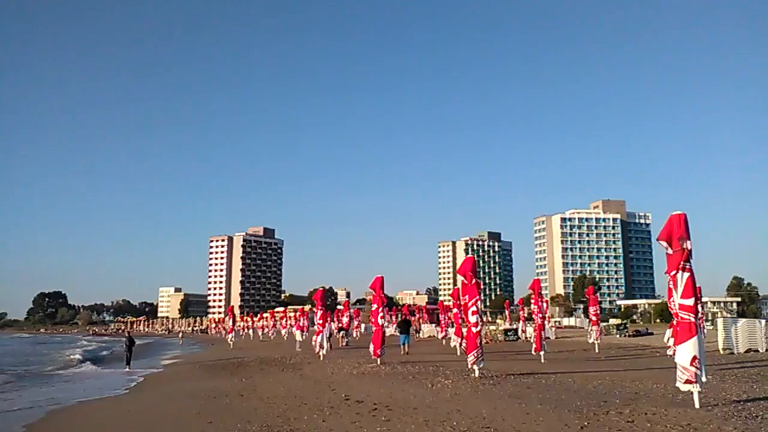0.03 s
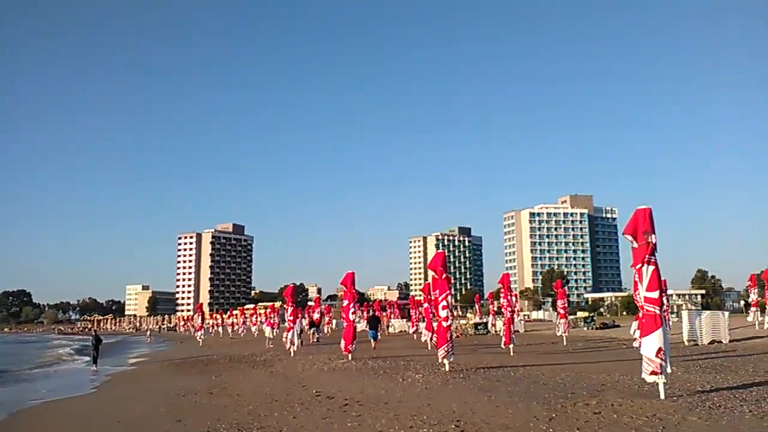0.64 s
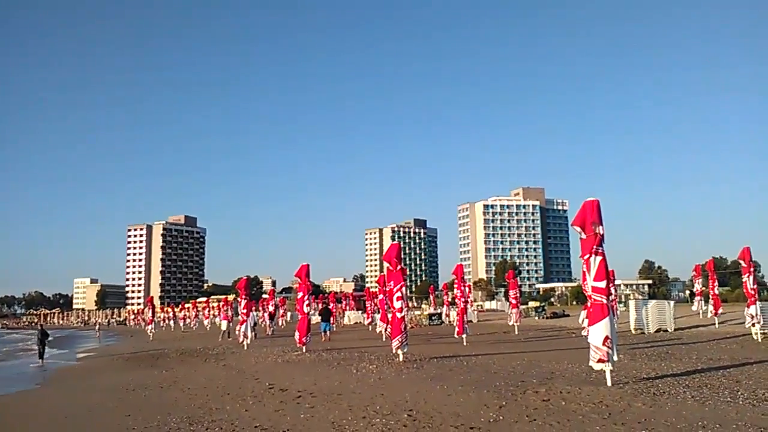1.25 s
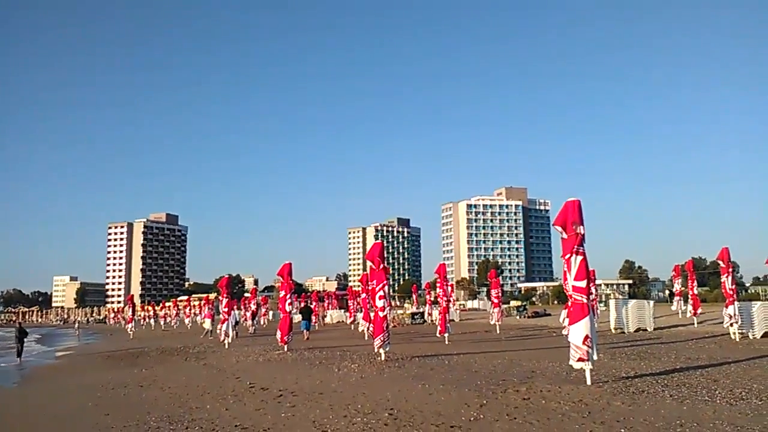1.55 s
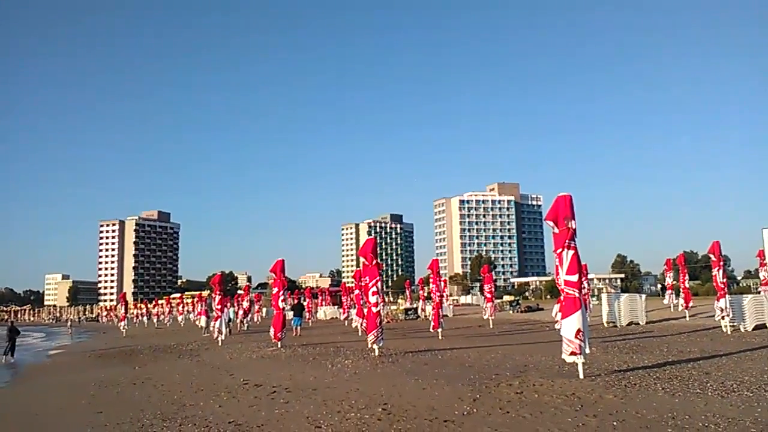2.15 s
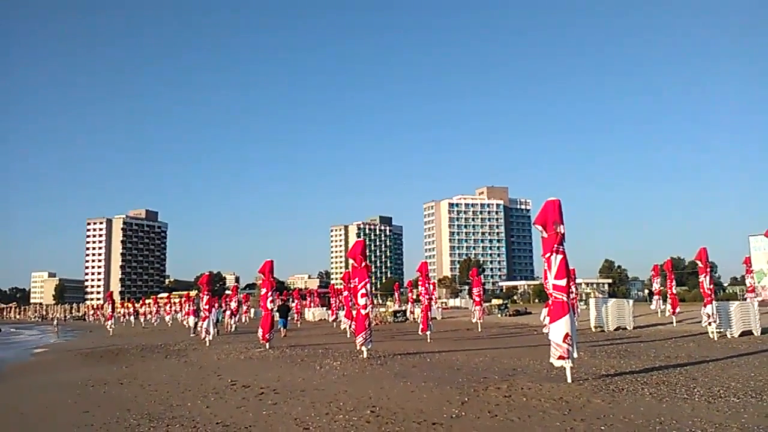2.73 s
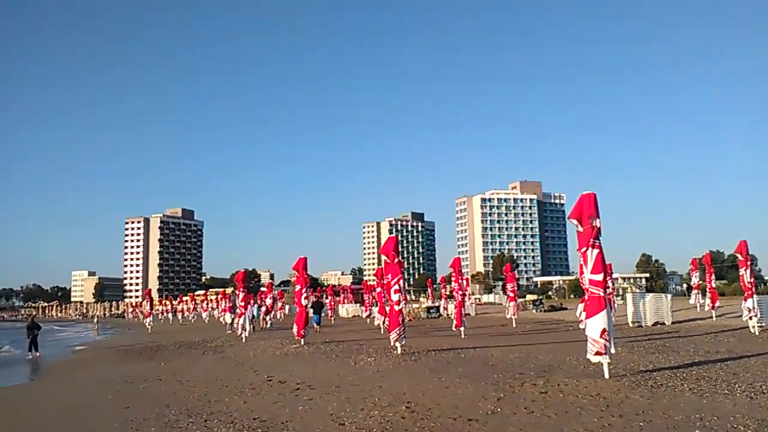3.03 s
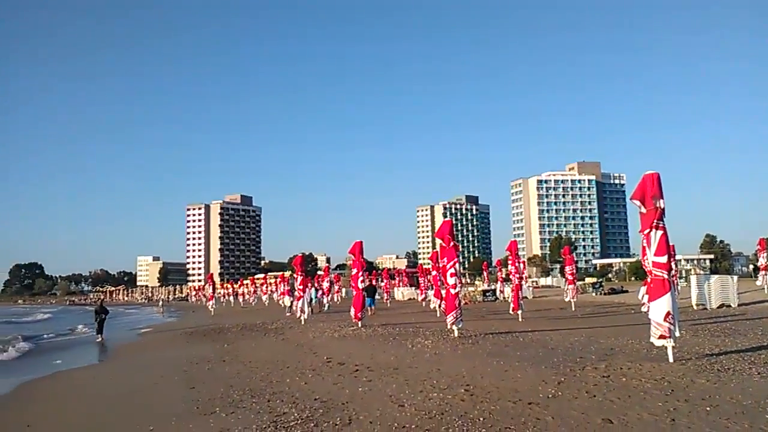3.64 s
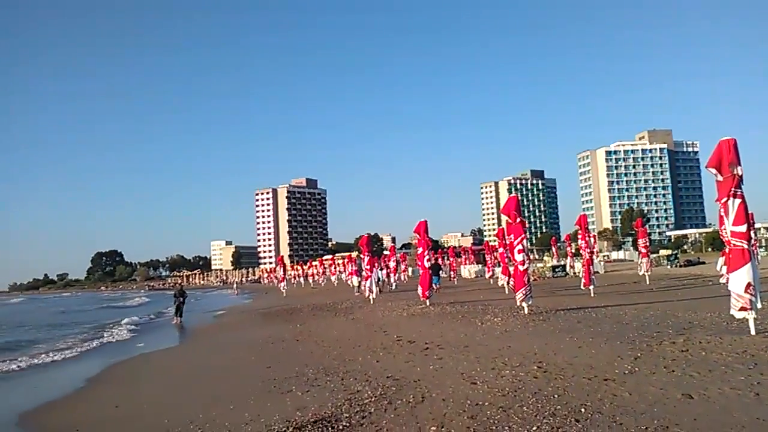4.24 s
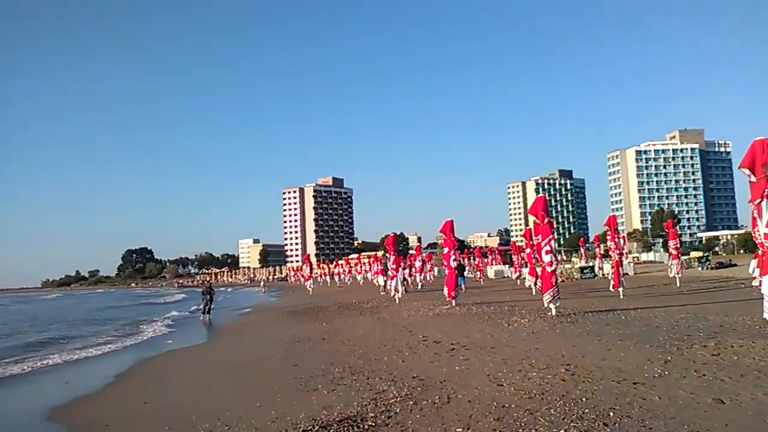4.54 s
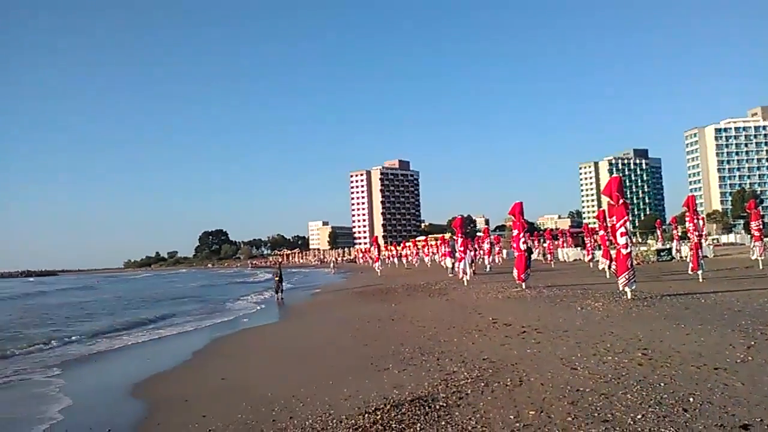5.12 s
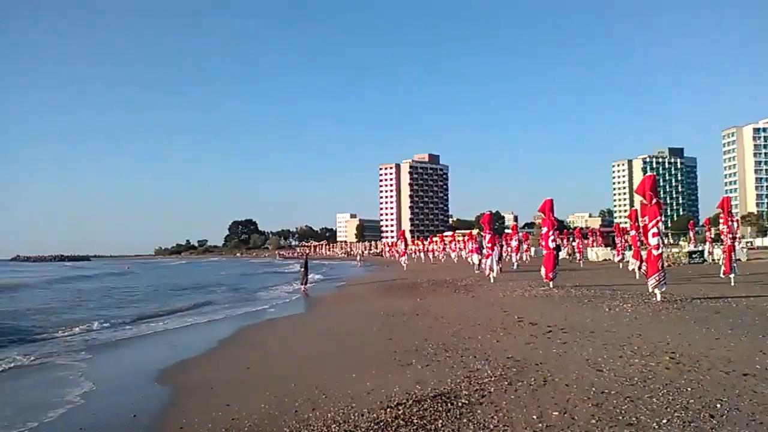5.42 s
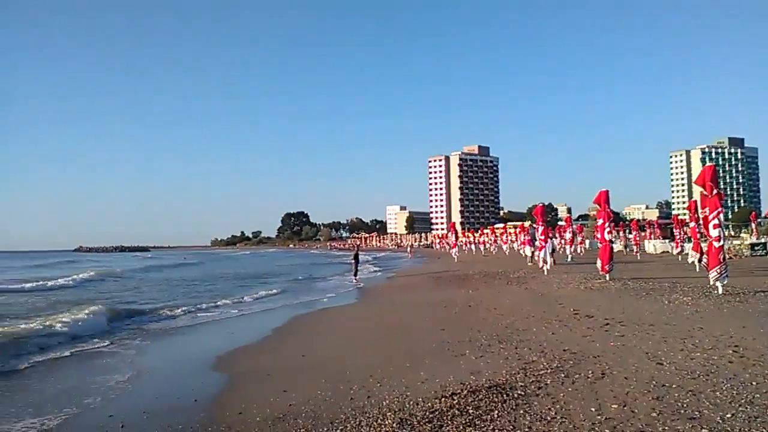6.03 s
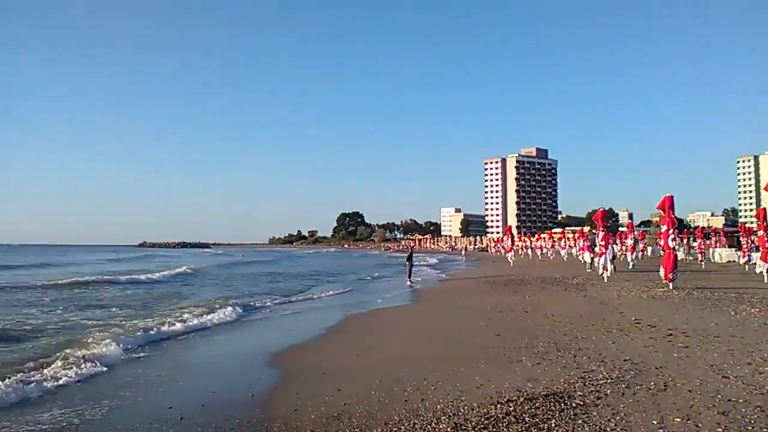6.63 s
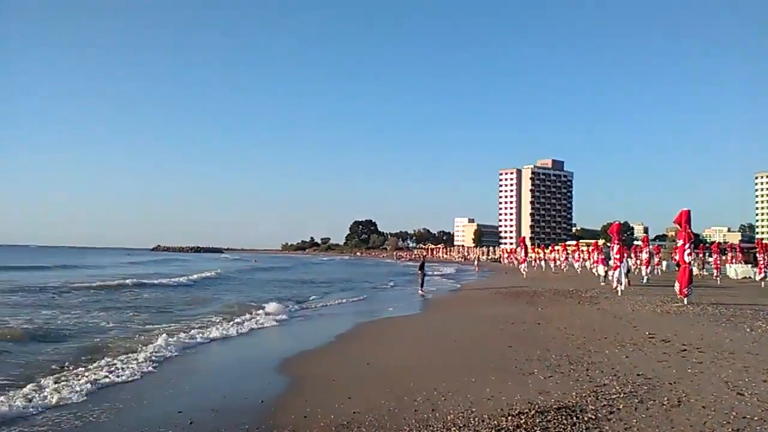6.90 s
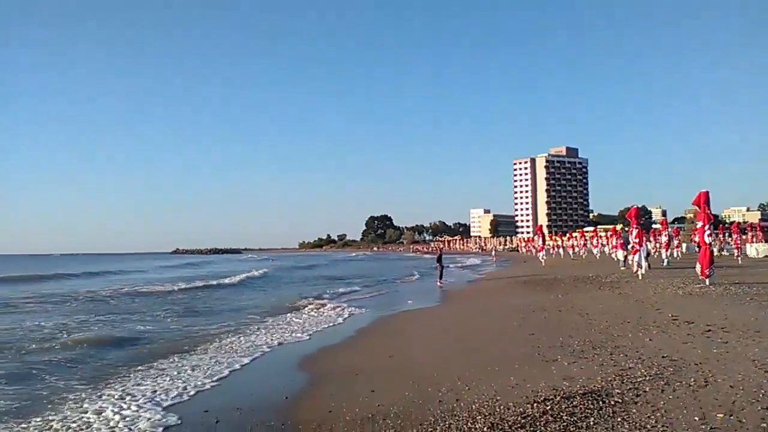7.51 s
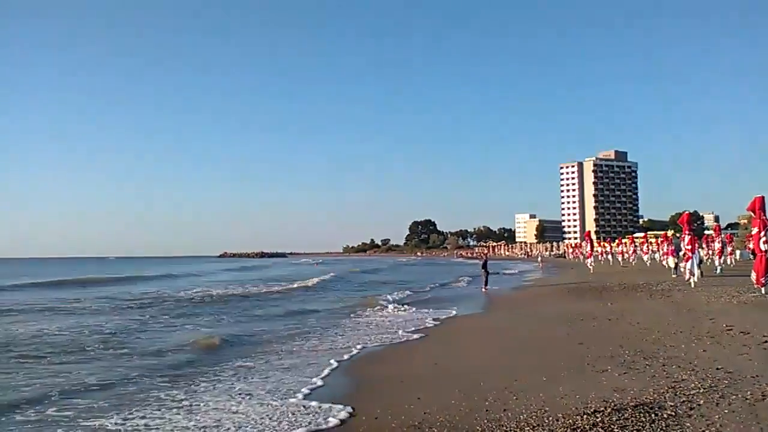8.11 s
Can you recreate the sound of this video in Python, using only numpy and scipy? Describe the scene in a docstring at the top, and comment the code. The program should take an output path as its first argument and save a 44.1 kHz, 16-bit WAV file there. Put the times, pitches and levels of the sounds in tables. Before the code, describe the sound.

Gentle surf tumbles, lulls, then breaks again closer and fizzes over sand, while a gusty breeze buffets the microphone.

```python
"""On a sandy beach a small wave breaks and runs out, the sea lulls, and a second breaks closer and foams
up the sand. Roar, foam and spray are turbulent noise mixed with damped ringing of bubbles and droplets.
A hand-held microphone turns slowly towards the water, so a close reflection interferes with the direct
sound and sweeps notches through the hiss. A breeze rumbles on the microphone and strikes it in gusts."""
import sys
import numpy as np
from scipy import signal
from scipy.fft import rfft, irfft, next_fast_len
from scipy.io import wavfile
from scipy.ndimage import uniform_filter1d, map_coordinates

SR = 44100
rng = np.random.default_rng(int(sys.argv[2]) if len(sys.argv) > 2 else 0)


def wav_out(sig):
    """Save sig, one row per channel (or a flat mono array), as 16-bit PCM at SR to the path in sys.argv[1]."""
    wavfile.write(sys.argv[1], SR, np.round(np.clip(np.atleast_2d(sig).T, -1, 1) * 32767).astype(np.int16))


N = 368676
BAND_LIMIT_HZ = 14250


# Breaking waves. Each row: time of full strength in seconds, length of the tumble in seconds,
# build-up in dB per second, roar level in dB, spray level in dB.
BREAKING_WAVES = [(1.68, 0.26, 8.5, -29, -36.5), (4.3, 0.21, 17.5, -35.5, -58),
                  (5.87, 0.13, 27, -35.5, -68), (6.43, .18, 36.5, -26.5, -41.5),
                  (6.83, 0.32, 37, -27, -35.5)]
# Sheets of water running up the sand. Each row: time of full strength in seconds, length in seconds,
# build-up in dB per second, foam level in dB, share of the fizz that carries, spray level in dB.
SWASHES = [(.62, 0.42, 17, -54, .2, -40.5), (1.6, 0.21, 14, -46.5, .3, -48), (3.2, 0.71, 20, -64, .2, -52),
           (3.848, 0.29, 20, -43.5, 0.36, -67), (5.616, 0.19, 15, -40.5, .05, -72),
           (7.0, 0.45, 32, -35.5, 0.86, -42.5), (8.31, 0.067, 40, -40.5, .95, -46)]

def surf_levels(t, far_roar_db=-39, far_foam_db=-61, far_spray_db=-55.5):
    """Incoherent addition: breakers, swashes and the far shore sum in power to four levels in dB."""
    roars, foams, fizzes, sprays = [far_roar_db], [far_foam_db], [], [far_spray_db]
    for start, length, build, roar_db, spray_db in BREAKING_WAVES:
        roars.append(roar_db + surge(t, start, length, build, fall_db_per_s=43))
        # spray bursts out faster than the roar builds
        sprays.append(spray_db + surge(t, start, length, 1.8 * build, fall_db_per_s=30.5))
    for start, length, build, foam_db, fizz_share, spray_db in SWASHES:
        # a sheet dies ever faster as it thins
        run_db = surge(t, start, length, build, fall_db_per_s=7.5, drag_db_per_s2=1)
        foams.append(foam_db + run_db)
        fizzes.append(foam_db + run_db + 20 * np.log10(np.clip(fizz_share, 1e-6, 1)))
        sprays.append(spray_db + run_db)
    return power_sum(roars), power_sum(foams), power_sum(fizzes), power_sum(sprays)


# Spectrum of tumbling water. Each row: frequency in Hz, relative level in dB.
ROAR_SPECTRUM = [(17, -46), (35, -11), (60, -4), (150, 2.5), (350, -0.5), (800, -4), (1500, -6.5),
                 (2500, -9.5), (4000, -15), (5000, -27), (6500, -37.5), (9000, -59), (14000, -67)]

def roar(level_db):
    """Turbulence in a breaker gives a lumpy rush, in which large bubbles resonate as a gurgle."""
    gurgle = amp(-15) * bubbles(count=3000, centre_hz=858, spread=0.553, cycles=32, scatter_db=1, size=640)
    return amp(level_db + 0.07 * wobble(18)) * coloured(churn(patchy_db=1.16) + gurgle, ROAR_SPECTRUM)


# Spectrum of foam on sand. Each row: frequency in Hz, relative level in dB.
FOAM_SPECTRUM = [(150, -44), (300, -10.5), (900, 1.5), (1600, -7), (2300, -2.5), (3200, -6.5), (4200, -16),
                 (5300, -8.5), (6800, -23), (9000, -56), (14000, -59)]

def foam(level_db, fizz_db, side_db=-6):
    """Small bubbles resonate at high pitch, so the sheet seethes as it runs over the sand ahead."""
    seethe = amp(-6) * bubbles(count=9500, centre_hz=2403, spread=0.391, cycles=34, scatter_db=2, size=300)
    sheet = coloured(churn(patchy_db=3) + seethe, FOAM_SPECTRUM) * amp([[0], [side_db]])
    # the finest fizz carries only when the foam is near
    fizz = filtered(sheet, lambda hz: along([(3500, 0.01), (4800, 0.76)], hz))
    carry = amp(fizz_db - level_db)
    return amp(level_db + 0.084 * wobble(25)) * (sheet + (carry - 1) * fizz)


# Spectrum of falling droplets. Each row: frequency in Hz, relative level in dB.
SPRAY_SPECTRUM = [(500, -59), (1000, -20), (2500, -10.5), (3700, -1), (5000, -12.5), (6500, -24),
                  (8200, -27), (11000, -35), (14000, -37.5)]

def spray(level_db):
    """Impact noise: droplets thrown from the crest patter back and merge into a fine hiss."""
    patter = amp(-12) * bubbles(count=7000, centre_hz=5500, spread=0.34, cycles=4, scatter_db=2, size=64)
    return amp(level_db + 0.32 * wobble(20)) * coloured(churn(patchy_db=2.35) + patter, SPRAY_SPECTRUM)


def churn(patchy_db):
    """Scattered splashes modulate two white noises (mid, side) in patches of time and frequency."""
    spectra = signal.stft(rng.standard_normal((2, N)), nperseg=512)[2]
    patches = uniform_filter1d(rng.standard_normal(spectra.shape[1:]), size=7, axis=0)
    patches = uniform_filter1d(patches, size=10, axis=1)
    return unit(signal.istft(spectra * amp(patchy_db * unit(patches)), nperseg=512)[1][:, :N])


def bubbles(count, centre_hz, spread, cycles, scatter_db, size):
    """Each bubble is a damped oscillator, size samples long, whose pitch rises as it nears the surface."""
    start, rank = rng.random((count, 2)).T[:, :, None]
    hz = np.clip(centre_hz * np.exp(spread * rng.standard_normal((count, 1))), 200, BAND_LIMIT_HZ)
    k = np.arange(size)
    turns = hz * k / SR
    age = turns / cycles
    strength = amp(-scatter_db * np.log(1 - .995 * rank))
    envelope = strength * np.exp(-3 * age) * (1 - k / size)
    ring = envelope * np.sin(2 * np.pi * turns * (1 + 0.063 * np.minimum(age, 2)))
    samples = (start * N).astype(int) + k
    return unit(np.bincount(samples.ravel(), ring.ravel(), N)[:N])


# The turn towards the sea. Each row: time in seconds, frequency of the first deep notch in Hz.
NOTCH_PATH = [(0.62, 2160), (2.75, 2110), (3.1, 2650), (4.3, 3020), (5.15, 2800), (5.7, 3370), (6.6, 3320),
              (7.35, 3780), (8.36, 3820)]
# The reflection, as off the hand. Each row: frequency in Hz, share that reaches the microphone.
ECHO_SHARE = [(600, 0.16), (1800, 1), (3000, 1.0), (5000, 0.47), (9000, 0.11), (13000, .02)]

def close_reflection(x, spacing=0.83, onset_hz=2020, growth_hz=755):
    """Comb filtering: as the microphone turns, an echo shortens and strengthens, and its notches climb."""
    hz, t, spectra = signal.stft(x, SR, nperseg=512)
    notch_hz = curve(NOTCH_PATH, t)
    strength = 0.69 * (1 - np.exp(-np.maximum(notch_hz - onset_hz, 0) / growth_hz))
    lag_cycles = (hz[:, None] / notch_hz - 1) / spacing  # notches lie spacing * notch_hz apart
    echo = strength * along(ECHO_SHARE, hz)[:, None] * np.exp(-2j * np.pi * lag_cycles)
    return signal.istft(spectra * (1 - echo), SR, nperseg=512)[1][:, :N]


# Slow drift of the finest hiss. Each row: time in seconds, base lift of the treble in dB.
TREBLE_DRIFT = [(.62, -5.5), (1.5, -7), (2.3, 4.5), (4.3, 4.5), (5.0, 6.5), (5.4, 6), (6.2, -2), (6.5, 2.5),
                (8.36, -5)]
# Stereo spread by frequency: centred below about 4 kHz, wider in the top hiss.
# Each row: frequency in Hz, gain of the side signal in dB.
SIDE_GAIN = [(3950, -80), (4150, -28), (5200, -14), (6200, -9.5), (7500, -4), (13000, -3.5)]

def sea(hiss_follows=0.81, even_db=9.5):
    """Superposition of roar, foam and spray in mid-side stereo; only the top of the hiss is wide."""
    t = np.arange(N) / SR
    roar_db, foam_db, fizz_db, spray_db = surf_levels(t)
    water = close_reflection(roar(roar_db) + foam(foam_db, fizz_db) + spray(spray_db))
    # the finest hiss comes and goes with the tumbling water
    lift_db = curve(TREBLE_DRIFT, t) + hiss_follows * (roar_db - spray_db - even_db)
    treble = filtered(water, lambda hz: along([(5500, 0.043), (11500, 0.78)], hz))
    mid, side = water + (amp(lift_db) - 1) * treble
    side = filtered(side, lambda hz: amp(along(SIDE_GAIN, hz)))
    return np.array([mid + side, mid - side])


# Falling crests: a surface slap is high, a plunge of trapped air is low.
# Each row: start in seconds, length in seconds, level in dB, centre frequency in Hz.
FALLING_CRESTS = [(1.806, .13, -38.5, 740), (5.719, 0.052, -39.5, 2300), (5.877, 0.021, -35.5, 2300),
                  (6.416, 0.05, -31, 1850), (6.54, 0.2, -34, 240), (7.088, 0.14, -34, 2330)]

def crests(width_octaves=0.34):
    """Bubble resonance: a crest drives in bubbles of about one size, heard as a brief band of noise."""
    out, t = np.zeros(N + SR), np.arange(SR // 2) / SR
    hz = np.fft.rfftfreq(len(t), 1 / SR)
    for start, length, db, centre_hz in FALLING_CRESTS:
        band = np.exp(-.5 * (np.log2((hz + 1) / centre_hz) / width_octaves) ** 2)
        cloud = unit(irfft(band * rfft(rng.standard_normal(len(t))), len(t)))
        swell = burst(t, length, rise_s=0.0089, fall_s=0.037)
        out[round(start * SR):][:len(t)] += amp(db) * cloud * swell
    return out[:N]


# Gusts on the microphone. Each row: start in seconds, length in seconds, level in dB, upper edge in Hz.
WIND_GUSTS = [(2.835, 0.02, -24.5, 110), (2.871, 0.0059, -19.5, 230), (2.879, 0.077, -20, 78),
              (2.969, 0.076, -20.5, 107), (3.073, 0.11, -26, 146), (3.134, 0.0081, -19.5, 240),
              (3.197, 0.075, -30.5, 170), (3.299, 0.018, -19.5, 121), (3.329, 0.12, -27, 121),
              (3.724, 0.13, -34.5, 110), (4.06, 0.058, -23, 110), (4.99, 0.085, -22.5, 224),
              (5.098, .09, -31.5, 190), (5.338, 0.043, -26, 85), (5.405, 0.1, -31, 99),
              (5.559, 0.029, -27, 110), (6.05, 0.02, -27, 89)]

def gusts(low_hz=48, slope=2.68):
    """Turbulence on the microphone gives short low thumps, each with its own level and upper edge."""
    out, t = np.zeros(N + SR), np.arange(SR // 2) / SR
    hz = np.fft.rfftfreq(len(t), 1 / SR)
    low_cut = (hz / low_hz) ** 3 / np.sqrt(1 + (hz / low_hz) ** 6)
    for start, length, db, edge_hz in WIND_GUSTS:
        band = low_cut / np.sqrt(1 + (hz / edge_hz) ** (2 * slope))
        band *= amp(along([(300, 7), (900, -20)], hz))  # the smallest eddies die away
        eddies = irfft(band * np.exp(2j * np.pi * rng.random(len(hz))), len(t))
        swell = burst(t, length, rise_s=0.0037, fall_s=0.01)
        out[round(start * SR):][:len(t)] += amp(db) * unit(eddies * swell) * np.sqrt(np.mean(swell ** 2))
    return out[:N]


# Strength of the breeze. Each row: time in seconds, level in dB.
BREEZE_LEVEL = [(0.62, -45.5), (1.95, -40.5), (2.35, -45), (3.5, -36), (4.85, -42.5), (5.5, -35.5),
                (6.25, -37), (6.7, -33), (7.2, -39), (7.5, -52.5), (8.1, -40)]
# Spectrum of wind rumble. Each row: frequency in Hz, relative level in dB.
RUMBLE_SPECTRUM = [(15, -52), (30, -20), (55, 2.5), (90, 1), (160, -13), (280, -25), (500, -29),
                   (1000, -60)]

def breeze():
    """Pressure fluctuations of slow eddies rolling over the microphone make a low rumble."""
    rumble = amp(2.8 * wobble(18)) * coloured(rng.standard_normal(N), RUMBLE_SPECTRUM)
    return amp(curve(BREEZE_LEVEL, np.arange(N) / SR)) * unit(rumble)


def burst(t, length, rise_s, fall_s):
    """Exponential attack, then exponential decay after length seconds."""
    return (1 - np.exp(-t / rise_s)) * np.exp(-np.maximum(t - length, 0) / fall_s)


def surge(t, start, length, rise_db_per_s, fall_db_per_s, drag_db_per_s2=0):
    """Growth and decay in dB: the level builds up to start, holds for length seconds and falls."""
    before, after = np.maximum(start - t, 0), np.maximum(t - start - length, 0)
    return -rise_db_per_s * before - fall_db_per_s * after - drag_db_per_s2 * after ** 2


def power_sum(levels_db):
    """Uncorrelated sounds add in power."""
    return 10 * np.log10(sum(amp(db) ** 2 for db in levels_db))


def amp(db):
    """Amplitude ratio from decibels."""
    return 10 ** (np.asarray(db) / 20)


def unit(x):
    """Normalisation to rms 1."""
    return x / np.sqrt(np.mean(x ** 2) + 1e-20)


def along(points, hz):
    """Interpolation of (Hz, value) points on a log frequency axis."""
    knots_hz, values = np.transpose(points)
    return np.interp(np.log(hz + 1), np.log(knots_hz), values)


def curve(points, t):
    """Linear interpolation of (seconds, value) points."""
    return np.interp(t, *np.transpose(points))


def wobble(rate):
    """Spline interpolation of random knots, rate of them a second."""
    return map_coordinates(rng.standard_normal(int(N * rate / SR) + 4), [np.arange(N) * rate / SR])


def filtered(x, response):
    """Linear filtering: the spectrum of x times a frequency response."""
    size = next_fast_len(N + 8192)
    return irfft(rfft(x, size) * response(np.fft.rfftfreq(size, 1 / SR)), size)[..., :N]


def coloured(x, spectrum):
    """Spectral shaping by (Hz, dB) points, at rms 1."""
    return unit(filtered(x, lambda hz: amp(along(spectrum, hz))))


def scene():
    """Superposition of the stereo sea with wind and crests alike in both channels."""
    return sea() + breeze() + gusts() + crests()


def record(dry, low_cut_hz=36, opens_s=0.621):
    """Band limiting: the microphone opens after a silence and drops the deepest bass and top treble."""
    opening = np.clip((np.arange(N) / SR - opens_s) / .0012, 0, 1)
    heard = filtered(dry, lambda hz: hz ** 4 / np.sqrt(hz ** 8 + low_cut_hz ** 8))
    return filtered(heard * opening, lambda hz: hz < BAND_LIMIT_HZ)


dry = scene()
out = record(dry)
wav_out(out)
```